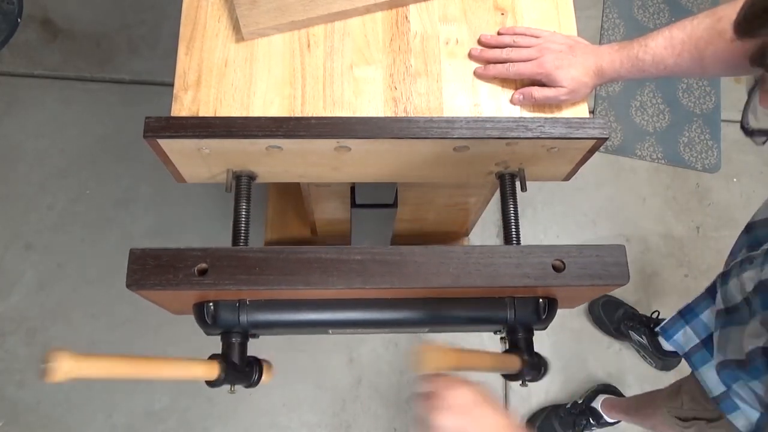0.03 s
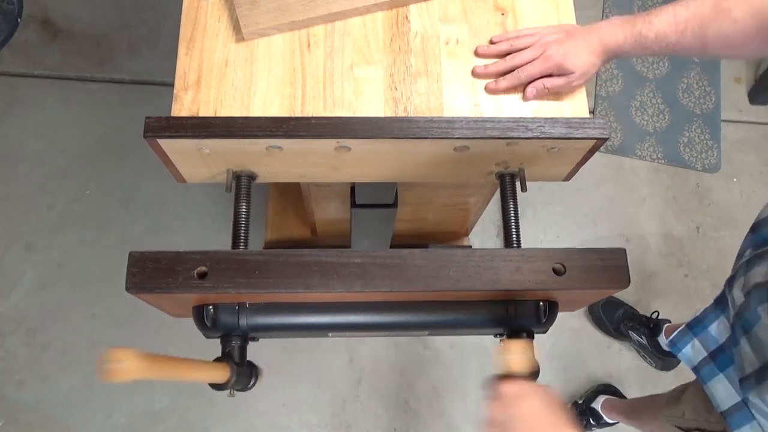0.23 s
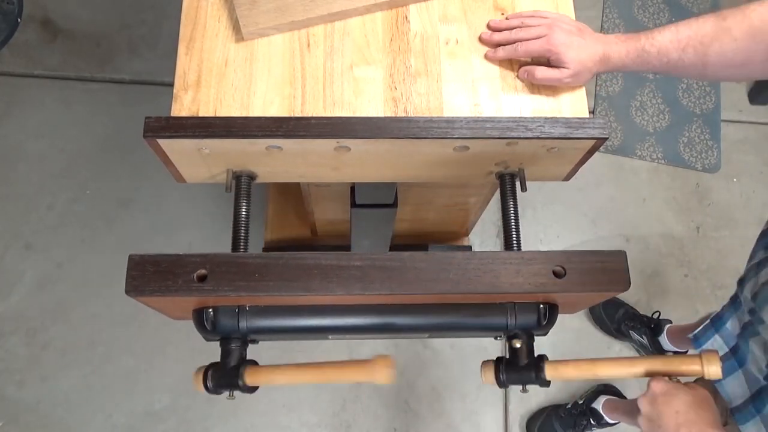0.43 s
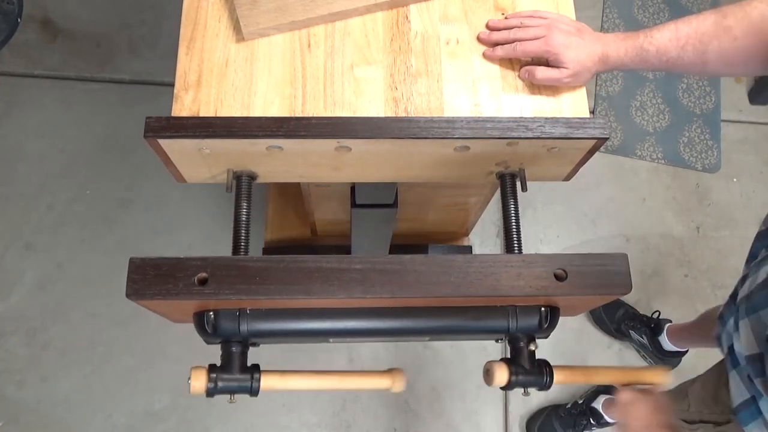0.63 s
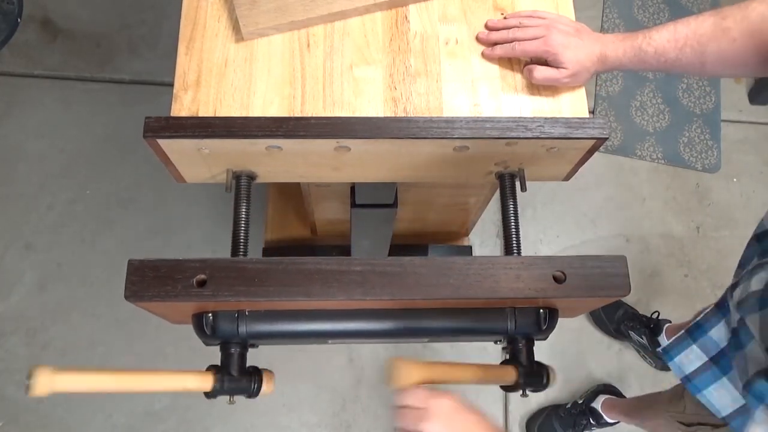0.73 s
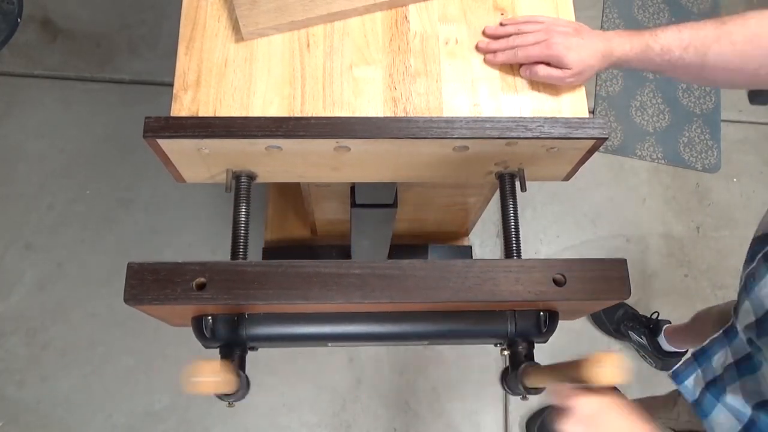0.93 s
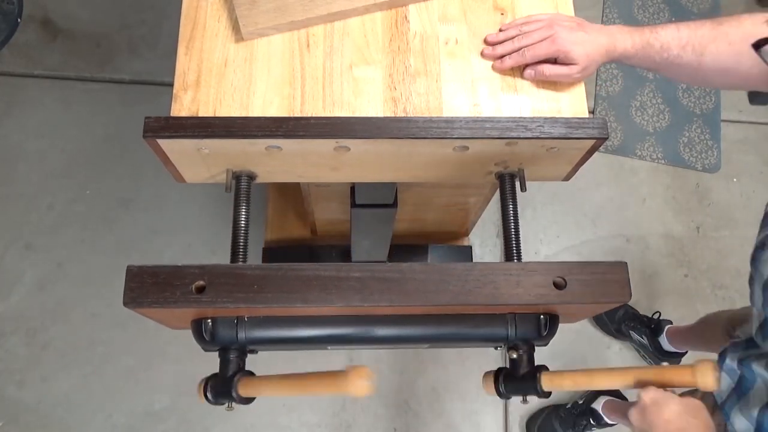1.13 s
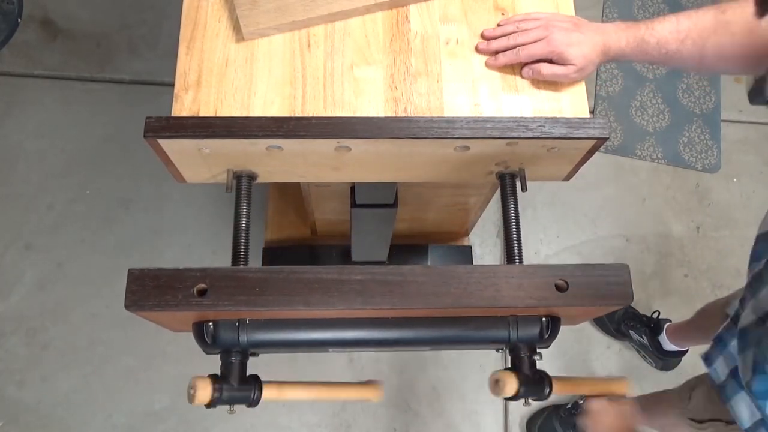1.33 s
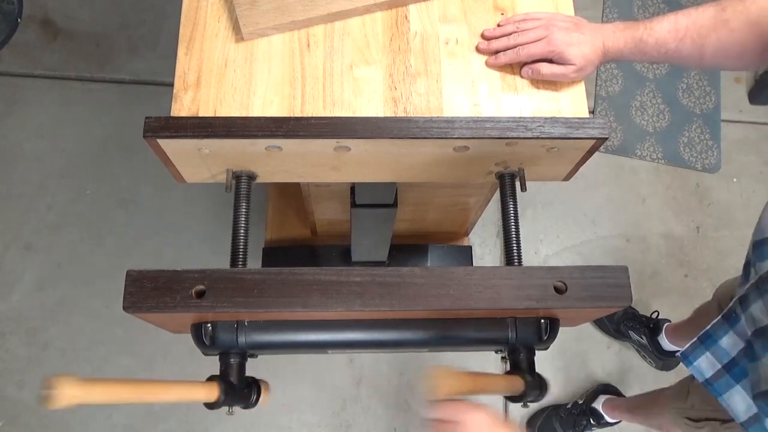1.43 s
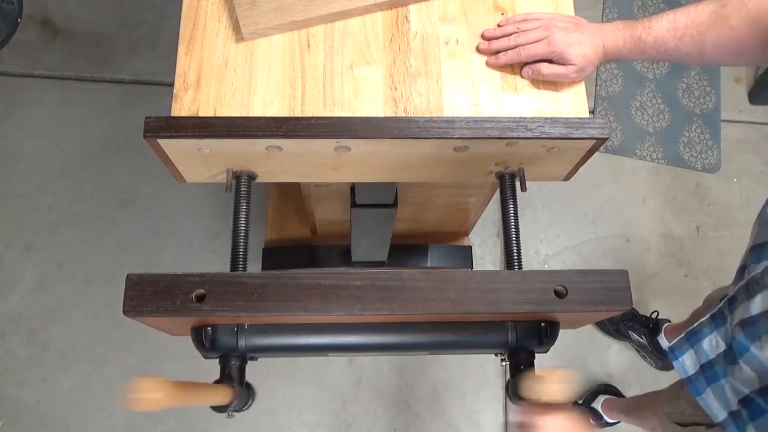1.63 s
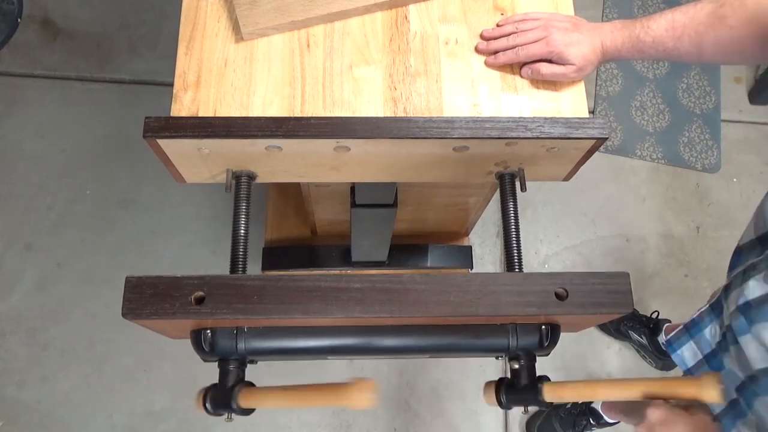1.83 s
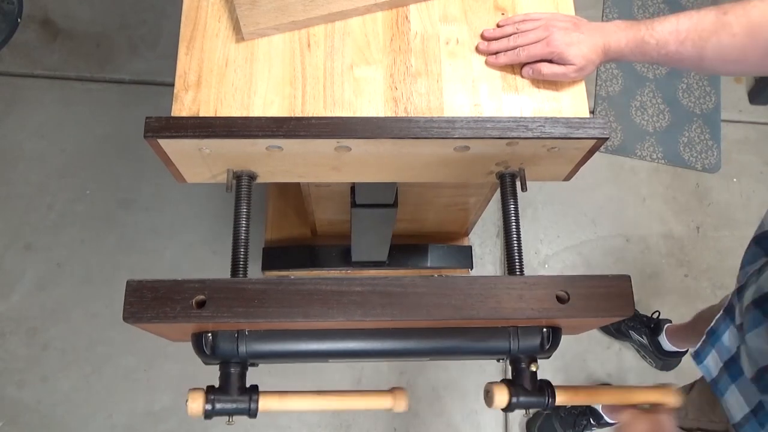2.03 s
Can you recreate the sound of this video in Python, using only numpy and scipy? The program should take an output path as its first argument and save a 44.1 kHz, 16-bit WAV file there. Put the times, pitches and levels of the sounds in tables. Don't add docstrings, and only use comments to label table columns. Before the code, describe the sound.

Steel vise threads rasp continuously while a linking chain ticks and hisses; a wooden handle cracks hard against its iron tee near the start, weaker loose knocks follow, with short workshop echoes and little bass on a close camera microphone.

```python
import sys
import numpy as np
from scipy import signal
from scipy.fft import rfft, irfft
from scipy.io import wavfile
from scipy.ndimage import uniform_filter1d

SR = 44100
rng = np.random.default_rng(int(sys.argv[2]) if len(sys.argv) > 2 else 0)


def wrap_up_sound(samples):
    columns = np.atleast_2d(samples).T
    tamed = np.clip(columns, -1, 1)
    steps = np.round(tamed * 32767).astype(np.int16)
    wavfile.write(sys.argv[1], SR, steps)


def boost(x):
    u = np.asarray(x, float) / 20
    return 10 ** u


N = 92610
BENCH_HZ = 235.8


def rms_one(x):
    return x / np.sqrt(np.mean(x ** 2) + 1e-20)


def drift(changes_per_s):
    count = int(N / SR * changes_per_s) + 3
    return np.interp(np.arange(N) / SR * changes_per_s, np.arange(count), rng.standard_normal(count))


def band(x, low_hz, high_hz):
    return signal.sosfilt(signal.butter(2, [low_hz, high_hz], "band", fs=SR, output="sos"), x)


def ring(clicks, hz, t60):
    decay, turn = boost(-60 / (t60 * SR)), 2 * np.pi * hz / SR
    return signal.lfilter([0, np.sin(turn)], [1, -2 * decay * np.cos(turn), decay * decay], clicks + 1e-18)


def grains(per_s, spread_db):
    sizes = boost(spread_db * np.minimum(rng.exponential(1, N), 4)) * rng.choice([-1, 1], N)
    return sizes * (rng.random(N) < per_s / SR)


def small_body(x):
    return signal.sosfilt(signal.butter(4, 980, "high", fs=SR, output="sos"), x)


def air_rumble():
    mid, side = rms_one(signal.lfilter([1], [1, -.98], rng.standard_normal((2, N))))
    return boost(-87.5) * (mid + 0.17 * side * np.array([[1], [-1]]))


def workshop(x, early, wet_db):
    t60_s, gap_s, wall_hz, even_hz = 0.16, 0.0036, 7000, 160
    side_db, low_side_db, side_hz = -10, -12, (2440, 13900)
    t = np.arange(SR // 2) / SR
    started = [t > gap_s, t > .0003]
    echoes = rng.standard_normal((2, len(t))) * boost(4.8 * rng.standard_normal(len(t)) - 60 * t / t60_s)
    echoes = echoes * started / np.sqrt(np.sum(echoes[0] ** 2))
    colour = np.sqrt(uniform_filter1d(np.abs(rfft(echoes)) ** 2, size=even_hz // 2, axis=1))
    echoes = irfft(rfft(echoes) / colour, len(t)) * started * (t < .4)
    for delay_s, db in early:
        echoes[:, int(delay_s * SR)] += boost(db - wet_db) * np.array([1, .3])
    mid, side = signal.fftconvolve(x[None], echoes, axes=1)[:, :N]
    mid = boost(wet_db) * signal.sosfilt(signal.butter(1, wall_hz, fs=SR, output="sos"), mid)
    side = boost(side_db) * (band(side, *side_hz) + boost(low_side_db) * side)
    return np.array([mid + side, mid - side])


def bench_hum(grind_db, rattle_db):
    width_hz = 49
    hum = rms_one(band(rng.standard_normal(N), BENCH_HZ - width_hz / 2, BENCH_HZ + width_hz / 2))
    return boost(grind_db + .5 * rattle_db - 13 + 1.7 * drift(10.8)) * hum


def threads(grind_db):
    # pitch_hz [Hz], width_hz [Hz], level_db [dB]
    screw_tones = [(605, 92, -9.5), (1172, 122, 8), (1400, 312, -0.5), (1694, 246, -2.5), (2000, 163, 0.5),
                   (2074, 77, 0.5), (2550, 104, -6), (2550, 187, -5.5), (3110, 300, -1.5),
                   (3136, 190, -1.5), (4640, 180, 0.5), (4640, 164, 4.5), (4860, 310, -5.5), (355, 40, -15)]
    # pitch_hz [Hz], level_db [dB per Hz]
    rasp_colour = [(150, -55), (400, -30.5), (850, -17), (1150, -7.5), (1600, -4.5), (2800, -1),
                   (4800, -2.5), (7200, -9.5)]
    slips_per_s, spread_db, slip_sway_db = 8000, 2.5, 1.3
    tone_sway_db, tone_sways_per_s = 2.3, 20
    rasp_db, level_db = 5.5, 1
    slips = grains(slips_per_s, spread_db) * boost(slip_sway_db * drift(30.42))
    rings = np.zeros(N)
    for k, (hz, width_hz, db) in enumerate(screw_tones):
        strength = boost(db + tone_sway_db * drift(tone_sways_per_s)) * np.sqrt(width_hz)
        rings += (-1) ** k * strength * rms_one(ring(slips, hz, 1.36 / width_hz))
    hz = np.maximum(np.fft.rfftfreq(N, 1 / SR), 1)
    at_hz, db = np.transpose(rasp_colour)
    colour = boost(np.interp(np.log(hz), np.log(at_hz), db)) / (1 + (hz / 8000) ** 8)
    rasp = irfft(rfft(slips) * colour, N)
    return boost(grind_db + level_db) * rms_one(rms_one(rings) + boost(rasp_db) * rms_one(rasp))


def link(low, high, fall_s):
    rise_s, low_hz, high_hz = 0.00015, (7790, 10370), (11200, 17800)
    t = np.arange(int(fall_s * SR * 7) + 9) / SR
    shape = (1 - np.exp(-t / rise_s)) * np.exp(-t / fall_s) * 4
    noise = rng.standard_normal((2, N))
    low, high = signal.fftconvolve(np.abs([low, high]), shape[None], axes=1)[:, :N] * noise
    return band(band(low, *low_hz), *low_hz) + band(band(high, *high_hz), *high_hz)


def chain_ticks(tick_fall_s):
    # start_s [s], level_db [peak dB], upper_db [extra dB of the upper ring], slide_db [dB]
    link_drops = [(0.053, -29.5, -12, -5), (0.273, -11, -18.5, -16), (0.296, -12, -16, -12.5),
                  (0.382, -23.5, -16, -18), (0.402, -15.5, -21, -17), (0.5264, -21, -22, -24),
                  (0.5458, -15, -18, -16), (0.5607, -6.5, -25, -17), (0.6433, -14, -13.5, -14),
                  (0.68, -35, -2, -20), (0.7523, -27.5, -18, -12), (0.7853, -17, -19.5, -25),
                  (0.819, -44, -14, 5), (1.0243, -17.5, -22, -16), (1.1238, -36, 1.5, -14),
                  (1.1613, -32, -4, -20), (1.191, -33, -3, -11), (1.1984, -21, -15, -12.5),
                  (1.2068, -20.5, -12, -12.5), (1.257, -17, -13, -15), (1.271, -33, -9, -1.5),
                  (1.2873, -21.5, -8, -23), (1.3074, -17, -15, -13), (1.5378, -19, -24, -19),
                  (1.6217, -47, -15, -14), (1.665, -27.5, -14.5, -10), (1.715, -16.5, -25, -10),
                  (1.786, -28, -19, -4.5), (1.8845, -26.5, -13, -9.5), (2.0261, -20.5, -20, -17.5),
                  (2.085, -27.5, -12, -6), (1.897, -31, -15, -14)]
    slide_s, tick_db, upper_slide = 0.011, -8.5, .35
    s, db, upper_db, slide_db = np.transpose(link_drops)
    at = (s * SR).astype(int)
    low, high, slide = np.zeros((3, N))
    low[at] = boost(db + tick_db)
    high[at] = boost(db + tick_db + upper_db + 18.5)
    slide[at] = boost(slide_db)
    return link(low, high, tick_fall_s) + link(low * slide, upper_slide * high * slide, slide_s)


def chain_rattle(rattle_db, tick_fall_s):
    touches_per_s, spread_db, sway_db = 440, -9, 3.5
    touch_db, hiss_db = -8, -6.5
    touches = grains(touches_per_s * boost(sway_db * drift(42)), spread_db)
    small = link(touches * rng.random(N), touches * rng.random(N), tick_fall_s)
    noise = rng.standard_normal((2, N))
    hiss = boost(0.99 * drift(33.7)) * band(noise[0], 3870, 11600)
    hiss += boost(0.5 * drift(23.0) - 1.5) * band(noise[1], 8400, 21400)
    return boost(rattle_db) * (boost(touch_db) * rms_one(small) + boost(hiss_db) * rms_one(hiss))


def strike(s, db, modes, tilt_db=0, favoured_hz=1500):
    favour_db, favour_octaves = 3, .45
    scatter_db, late_cycles, contact_s = 1.5, 2.2, .00004
    out = np.zeros(N)
    luck = rng.standard_normal((len(s), len(modes), 3))
    for k, (hz, mode_db, t60) in enumerate(modes):
        clicks = np.zeros(N + SR)
        nearness = np.exp(-(np.log2(hz / favoured_hz) / favour_octaves) ** 2)
        colour_db = favour_db * (nearness - .5) + tilt_db * np.log2(hz / 2000)
        size = boost(db + mode_db + colour_db + scatter_db * luck[:, k, 0]) * (-1) ** k
        touch_s = s + (late_cycles - 1) / hz
        rebound_s = s + late_cycles / hz + contact_s * np.abs(luck[:, k, 2])
        np.add.at(clicks, (touch_s * SR).astype(int), 0.11 * size)
        np.add.at(clicks, (rebound_s * SR).astype(int), size)
        out += ring(clicks[:N], hz, t60)
    return small_body(out)


def clack(s, db, tilt_db, chatter_db):
    crack_s, crack_hz, chatter_hz = 0.0034, (1080, 3900), (1410, 2900)
    thud_s, thud_hz, thud_db = 0.026, (509, 960), -35.5
    t = np.arange(SR // 8) / SR
    crack = (1 - np.exp(-t / 0.000073)) * boost(-1) * np.exp(-t / crack_s)
    chatter = (1 - np.exp(-t / 0.0014)) * boost(-14) * np.exp(-t / 0.017)
    thud = np.exp(-t / thud_s) * (1 - np.exp(-t / 0.013))
    out, low = np.zeros((2, N + SR))
    noise = rng.standard_normal((len(s), 2, len(t)))
    starts = (s * SR).astype(int)
    for start, level_db, tilt, loose_db, (fine, lumps) in zip(starts, db, tilt_db, chatter_db, noise):
        here = slice(start, start + len(t))
        rough = fine * boost(14.0 * uniform_filter1d(lumps, size=60))
        tones = rfft(crack * rough)
        lumpy = np.sqrt(uniform_filter1d(np.abs(tones) ** 2, size=240 // 8))
        snap = irfft(tones / lumpy, len(t)) * np.sqrt(np.sum(crack ** 2)) * (t < 5 * crack_s)
        loose = boost(loose_db) * chatter * rough
        bright = boost(2.84 * tilt - 12.0) * band(snap + 0.24 * loose, crack_hz[1], 6000)
        out[here] += boost(level_db) * (band(snap, *crack_hz) + band(loose, *chatter_hz) + bright)
        low[here] += boost(0.99 * level_db + thud_db) * band(lumps * thud, *thud_hz) * 8
    return small_body(out[:N]) + low[:N]


def handles_and_jaw():
    # start_s [s], level_db [peak dB], brightness_db [dB per octave], chatter_db [dB],
    # favoured_hz [Hz]
    knock_events = [
        (0.2306, -2, 2, -7.5, 1430),
        (0.2940, -27.5, 11.5, -4, 5440),
        (0.4290, -17, 2, 11.5, 2000),
        (1.164, -13.5, -2, 5, 2400),
        (1.3080, -17.5, 6, 12, 2650),
        (1.5808, -14.5, 3.5, 9.5, 3100),
        (1.8034, -12.5, 4.5, 6, 2900),
    ]
    # start_s [s], level_db [peak dB]
    bump_events = [
        (0.0227, -26),
        (0.0484, -23),
        (0.196, -24.5),
        (0.2617, -29),
        (1.6658, -27),
        (1.695, -28),
        (1.8899, -21.5),
        (1.912, -34.5),
        (0.284, -23),
        (1.141, -38),
    ]
    # pitch_hz [Hz], level_db [dB], t60_s [s to fall 60 dB]
    tee_tones = [(1130, -8, .012), (1394, -5, .012), (1685, -4, .015), (1810, -4, .012), (2000, -5, .01),
                 (2200, -3, .012), (2380, -3, .015), (2600, -4, .01), (2790, -3, .008), (3050, -3, .008),
                 (3380, -2, .008), (4054, -6, .005), (5050, -9, .004), (6300, -13, .002)]
    # pitch_hz [Hz], level_db [dB], t60_s [s to fall 60 dB]
    jaw_tones = [(1053, 14.5, 0.0084), (1130, 15.5, 0.003), (1383, 7.5, 0.014), (1867, 5, 0.017),
                 (2330, 6, 0.012), (3100, -2, .006)]
    knock_db, jaw_db, bench_kick_db = -4.5, -14, -44.5
    s, db, tilt_db, chatter_db, favoured_hz = np.transpose(knock_events)
    bump_s, bump_db = np.transpose(bump_events)
    jolts = np.zeros(N)
    jolts[(np.r_[s, bump_s] * SR).astype(int)] = boost(np.r_[.6 * db, .3 * bump_db] + bench_kick_db)
    bench = ring(ring(jolts, BENCH_HZ, 0.14), BENCH_HZ * 0.71, 0.022) / 100
    knocks = strike(s, db + knock_db, tee_tones, tilt_db, favoured_hz)
    knocks = knocks + clack(s, db, tilt_db, chatter_db)
    return knocks + strike(bump_s, bump_db + jaw_db, jaw_tones) + bench


def scene():
    # start_s [s], grind_db [dB], rattle_db [dB]
    crank_effort = [(0, -39, -39), (.1, -36.5, -38), (0.192, -40.5, -39), (.37, -42.5, -40),
                    (.5, -40, -40.5), (.66, -39.5, -40), (.82, -38.5, -44.5), (.91, -42.5, -45.5),
                    (1.06, -42.5, -43), (1.14, -38.5, -40.5), (1.27, -42.5, -40), (1.45, -40.5, -36),
                    (1.55, -40.5, -42.5), (1.721, -38, -37), (1.79, -42, -46), (1.921, -39, -32),
                    (2.01, -43, -46.5), (2.1, -41.5, -37.5)]
    # delay_s [s], level_db [dB]
    first_echoes = [(.0045, -9), (.0093, -8.5), (0.0132, -13.5), (0.0175, -12), (0.0217, -11.5),
                    (0.035, -13.5)]
    room_db, bed_wet_db, tick_fall_s = -2.5, -10, 0.00051
    s, grind_db, rattle_db = np.transpose(crank_effort)
    t = np.arange(N) / SR
    grind_db, rattle_db = np.interp(t, s, grind_db), np.interp(t, s, rattle_db)
    bed = bench_hum(grind_db, rattle_db) + threads(grind_db) + chain_rattle(rattle_db, tick_fall_s)
    blows = chain_ticks(tick_fall_s) + handles_and_jaw()
    room = workshop(blows, first_echoes, room_db) + workshop(bed, [], room_db + bed_wet_db)
    return air_rumble() + bed + blows + room


def top_cut(x):
    return signal.sosfilt(signal.butter(12, 16980, fs=SR, output="sos"), x)


def record(dry):
    ceiling, bass_cut_hz, noise_db, top_hz = 1.25, 269, -83, 15950
    rounded = ceiling * np.tanh(dry / ceiling)
    thin = signal.sosfilt(signal.butter(2, bass_cut_hz, "high", fs=SR, output="sos"), rounded)
    noise = [[1, .2], [1, -.2]] @ rng.standard_normal((2, N))
    thin = thin + boost(noise_db) * rms_one(signal.lfilter([1], [1, -.985], noise))
    mix = signal.sosfilt(signal.cheby2(18, 52, top_hz, fs=SR, output="sos"), thin)
    return top_cut(mix)


dry = scene()
out = record(dry)
wrap_up_sound(out)
```